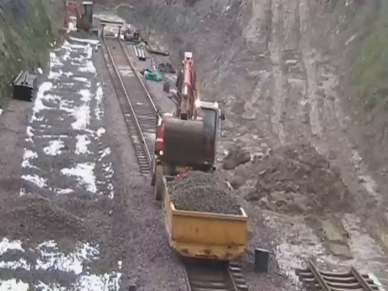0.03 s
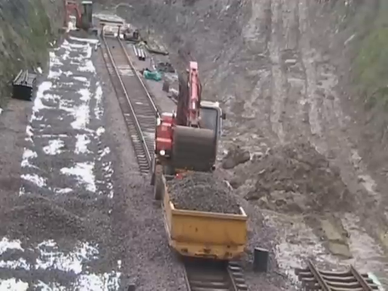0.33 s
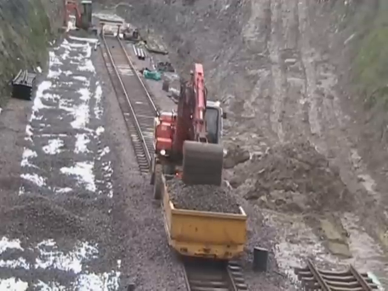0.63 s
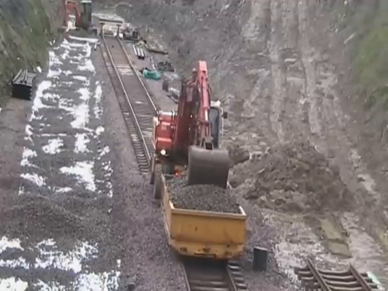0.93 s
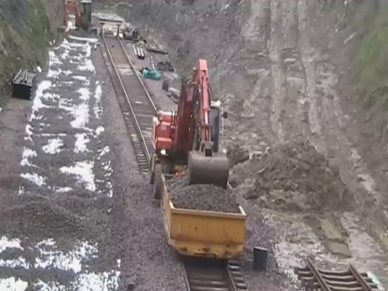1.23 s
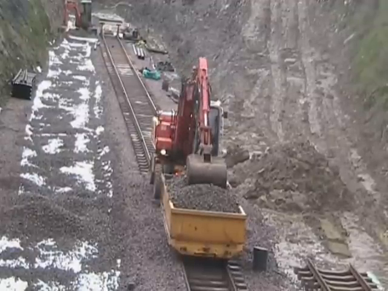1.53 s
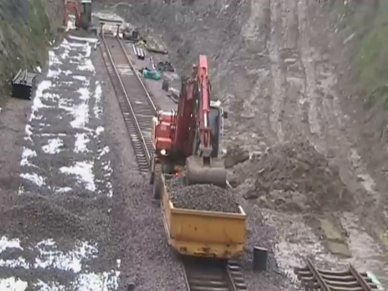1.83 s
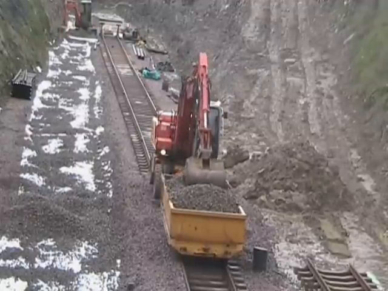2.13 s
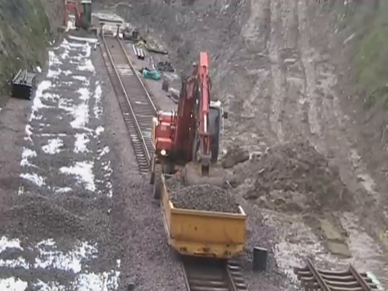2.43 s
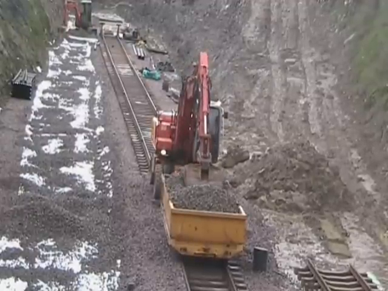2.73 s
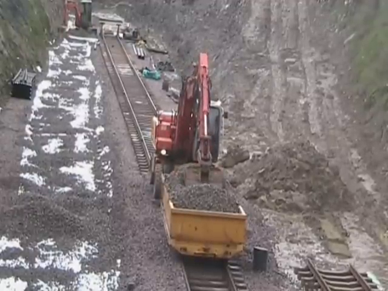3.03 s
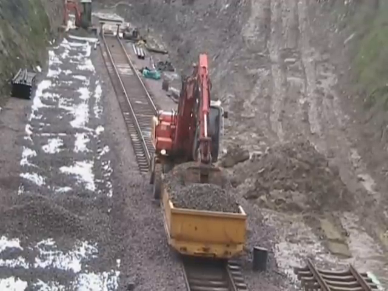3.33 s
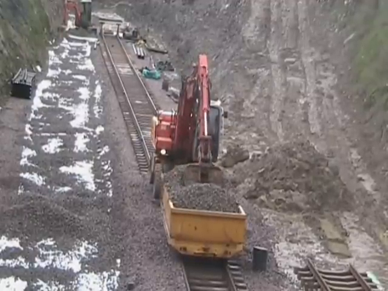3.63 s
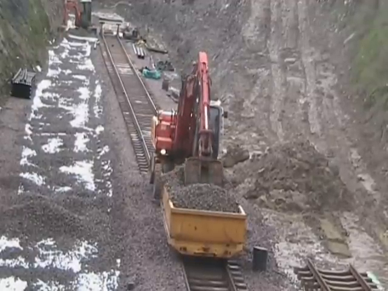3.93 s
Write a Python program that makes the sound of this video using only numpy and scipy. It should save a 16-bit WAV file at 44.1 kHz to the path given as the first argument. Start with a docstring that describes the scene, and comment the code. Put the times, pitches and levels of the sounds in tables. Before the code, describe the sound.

An excavator bucket bangs and scrapes through crunching stones in a wagon, its diesel engine rumbling.

```python
"""In a railway cutting, some way off, a diesel excavator rumbles while its hydraulic pump whines.
Its steel bucket bangs into a wagon of ballast (track stones) and scrapes through it: the wagon booms,
the stones crunch, and loose ones clatter and tick against the steel as the bucket curls.
Small birds call faintly over a very light breeze."""
import sys
import numpy as np
from scipy import signal
from scipy.fft import rfft, irfft
from scipy.io import wavfile
from scipy.ndimage import uniform_filter1d

SR = 44100
rng = np.random.default_rng(int(sys.argv[2]) if len(sys.argv) > 2 else 0)


def materialize(psi):
    """Save the field psi as 16-bit PCM at rate SR to the path in sys.argv[1].

    A 1-D psi becomes a single channel; in a 2-D psi each row is a channel.
    """
    bounded = np.clip(np.atleast_2d(psi).T, -1, 1)
    quanta = np.round(bounded * 32767).astype(np.int16)
    wavfile.write(sys.argv[1], SR, quanta)


N = 176400
T = np.arange(N) / SR
HIT_T = T[:SR // 4]  # the clock for a single hit: a quarter of a second


# the bucket hits the load: (time [s], level [dB], brightness [Hz])
BUCKET_BLOWS = [(.628, -11.5, 400), (.647, -13, 900), (0.663, -12, 647), (.679, -16, 1000),
                (.692, -6, 1660), (.705, -8, 660), (0.804, -11, 590), (.839, -15.5, 500),
                (2.658, -15.5, 500), (2.731, -18, 400), (3.727, -23.5, 448)]
# notes of the bucket and wagon: (pitch [Hz], level [dB], time to fade by 60 dB [s])
STEEL_NOTES = [(165.6, -8.5, 0.17), (192.6, -7, 0.15), (255, -9.5, 0.13), (375, -11.5, 0.23),
               (557, -10, .19), (818, -17.5, 0.47), (1077, -13, 0.18), (1500, -32, .25)]
def bucket():
    """Each blow crushes a few stones and sets the steel ringing."""
    out = np.zeros(N)
    attack_s, crush_decay_s = .0011, .0086
    for s, db, bright_hz in BUCKET_BLOWS:
        noise = band(rng.standard_normal(len(HIT_T)), [168, 2870], "band")
        blow = rms_one(band(noise, bright_hz, "low")) * np.exp(-HIT_T / crush_decay_s)
        for hz, note_db, fade_s in STEEL_NOTES:
            # a dull blow barely rings the high notes
            strength = from_db(note_db + rng.normal(0, 1)) / np.hypot(1, hz / bright_hz)
            blow = blow + strength * ring(hz, fade_s)
        add(out, s, from_db(db) * blow * (1 - np.exp(-HIT_T / attack_s)))
    return band(out, 170, "high")


# how loud each part of the shifting load is: (time [s], level [dB])
BOOM_LEVEL = [(0, -91.5), (.62, -70), (.68, -17.5), (.9, -25.5), (1.1, -23.5), (1.3, -21.5), (1.55, -23.5),
              (1.8, -21.5), (2.1, -26), (2.4, -23.5), (2.68, -18.5), (3.0, -24.5), (3.4, -28),
              (3.65, -36.5), (3.82, -28.5), (4, -38)]
CRUNCH_LEVEL = [(0, -90), (.6, -92), (.66, -24.5), (.87, -26.5), (1.0, -22.5), (1.12, -24.5), (1.32, -20),
                (1.72, -20.5), (1.9, -24), (2.15, -26.5), (2.35, -25), (2.6, -18.5), (2.85, -24),
                (3.15, -28.5), (3.45, -28.5), (3.68, -32), (3.82, -28.5), (4, -34.5)]
CLATTER_LEVEL = [(0, -99), (.61, -75), (.66, -32.5), (.87, -36), (.93, -25), (1.02, -23.5), (1.12, -28),
                 (1.4, -25), (1.75, -26.5), (2.15, -32.5), (2.4, -29.5), (2.62, -26), (2.88, -25.5),
                 (2.97, -30), (3.18, -36), (3.48, -27), (3.7, -30), (4, -27.5)]
CHIP_LEVEL = [(0, -93), (.62, -61), (.68, -41.5), (.87, -48.5), (.92, -36.5), (1.02, -29.5), (1.13, -33.5),
              (1.5, -31.5), (1.85, -37.5), (2.3, -39.5), (2.65, -34), (2.9, -35), (3.05, -41.5),
              (3.32, -37), (3.55, -33), (3.72, -34.5), (4, -34.5)]
# each part's mix of low and high sound: (frequency [Hz], relative level [dB])
BOOM_SPECTRUM = [(45, -35), (75, -15), (110, -11), (170, -3), (230, -5), (285, 1.5), (340, -6), (410, -13),
                 (520, -30.5)]
CRUNCH_SPECTRUM = [(370, -8.5), (450, -1.5), (620, -3), (810, -2), (930, -4), (1160, -3.5), (1290, -3.5),
                   (1520, -6.5), (1900, -14.5)]
CLATTER_SPECTRUM = [(1500, -22.5), (1850, -8.5), (2150, 1.5), (2450, -4), (2800, -5), (3200, -11),
                    (3900, -18.5)]
CHIP_SPECTRUM = [(3200, 0.5), (4000, 1.5), (5200, -1), (6500, -6.5), (7600, -9.5), (8800, -15.5),
                 (10000, -29.5)]
def ballast():
    """The load shifts: the wagon booms, stones crunch and clatter, and fine chips tick on top."""
    return (gravel(BOOM_LEVEL, BOOM_SPECTRUM, hits_per_s=770, spread_db=.5, bands=14)
            + gravel(CRUNCH_LEVEL, CRUNCH_SPECTRUM, hits_per_s=1900, spread_db=3, bands=22)
            + gravel(CLATTER_LEVEL, CLATTER_SPECTRUM, hits_per_s=1500, spread_db=0, bands=10)
            + gravel(CHIP_LEVEL, CHIP_SPECTRUM, hits_per_s=3200, spread_db=0, bands=12))


def gravel(level, spectrum, hits_per_s, spread_db, bands):
    """Stones collide at random; each hit rings its own mix of narrow frequency bands."""
    hits = np.flatnonzero(rng.random(N) < hits_per_s / SR)
    sizes = from_db(spread_db * np.minimum(rng.exponential(1, N), 4))[hits]
    edges = np.geomspace(spectrum[0][0], spectrum[-1][0], bands + 1)
    out = np.zeros(N)
    for low, high in zip(edges, edges[1:]):
        clicks = np.zeros(N)
        clicks[hits] = sizes * rng.standard_normal(N)[hits]
        out += from_db(at_hz(spectrum, np.sqrt(low * high))) * band(clicks, [low, high], "band")
    # even out the loudness over this stretch, so the stones sound steady and follow their level curve
    window = int(.086 * SR)
    power = uniform_filter1d(uniform_filter1d(out ** 2, window), window)
    return from_db(in_time(level)) * out / np.sqrt(np.abs(power) + 1e-12)


# steel dragging through the stones: (time [s], level [dB])
SCRAPE_LEVEL = [(.86, -73.5), (.96, -26.5), (1.25, -23.5), (1.6, -23.5), (1.85, -28.5), (2.2, -33),
                (2.6, -27.5), (2.95, -38), (4, -34)]
# notes of the dragged bucket: (pitch [Hz], width [Hz], relative level [dB])
SCRAPE_NOTES = [(810, 18, -3), (1034, 53, -5.5), (1272, 42, -1), (1427, 35, -6.5), (1947, 20, -8)]
def scrape():
    """Stones slip along the steel and ring its notes, which wander as the load shifts."""
    slips_per_s, wander = 500, .015
    slips = rng.random(N) < slips_per_s / SR
    out = np.zeros(N)
    for hz, width_hz, db in SCRAPE_NOTES:
        kicks = slips * (rng.standard_normal(N) + 1j * rng.standard_normal(N))  # random size and phase
        fading = signal.lfilter([1], [1, -np.exp(-np.pi * width_hz / SR)], kicks + 1e-18)
        pitch = hz * (1 + wander * drift(2.5))
        note = np.real(fading * np.exp(2j * np.pi * np.cumsum(pitch) / SR))
        out += from_db(db) * rms_one(note)
    return from_db(in_time(SCRAPE_LEVEL)) * rms_one(out)


# the bucket's lip catches, and stones knock inside its shell: (time [s], level [dB])
LIP_CHINKS = [(.888, -21), (.899, -22), (.934, -17.5), (.962, -22), (.995, -24.5), (1.008, -19.5),
              (1.016, -15.5)]
SHELL_KNOCKS = [(2.777, -18), (2.806, -18.5), (2.816, -14), (2.905, -14), (3.236, -21), (3.557, -25),
                (3.578, -18), (3.622, -22), (3.728, -16)]
# notes of the lip and shell: (pitch [Hz], level [dB], time to fade by 60 dB [s])
LIP_NOTES = [(2640, -14.5, .07), (2930, -0.5, 0.084), (3150, -5.5, 0.063), (3268, -13.5, .15),
             (3950, -7.5, 0.058)]
SHELL_NOTES = [(2050, -8, 0.083), (2180, -5, 0.056), (2325, -7, 0.047), (2814, -7.5, 0.099)]
def struck_steel(hits, notes):
    """Steel rings briefly and brightly, a little differently at each spot that is hit."""
    out = np.zeros(N)
    for s, db in hits:
        for hz, note_db, fade_s in notes:
            pitch = hz * (1 + rng.normal(0, .008))
            add(out, s, from_db(db + note_db) * ring(pitch, fade_s))
    return out


# single stones collide: (time [s], level [dB], pitch [Hz], width [octaves], decay time [s])
STONE_CRACKS = [(.684, -31.5, 5200, 1.3, .018), (.887, -29.5, 4500, 0.23, .01),
                (.961, -24.5, 3300, 1.2, 0.006), (1.001, -21, 5200, 0.44, 0.0065),
                (1.01, -25, 5160, 1, 0.01), (1.118, -29, 5450, 0.73, .009), (1.935, -28, 5750, 0.64, 0.012),
                (2.107, -27, 5300, 0.55, .008), (2.207, -21, 2960, 0.61, 0.0087),
                (2.207, -21, 7000, 0.61, 0.0092), (2.558, -25.5, 6000, 0.97, 0.02),
                (2.654, -23.5, 5400, 0.51, 0.0063), (3.069, -28, 4500, 1.4, .009),
                (3.166, -26.5, 5070, 1.2, .006), (3.232, -28, 3400, 1.4, .008),
                (3.498, -23, 3912, 0.81, 0.013), (3.556, -22, 4900, 0.71, .009),
                (3.585, -25, 4500, 1.3, 0.0031), (3.642, -18, 6530, 0.21, .004),
                (3.768, -27, 5600, 0.7, .004), (3.861, -24.5, 6200, 1.6, .009),
                (3.956, -14.5, 5016, 3.1, 0.0033)]
def loose_stones():
    """Each stone cracks around its own pitch: a snap at first touch, then a short rattle."""
    out = np.zeros(N)
    snap_gain, snap_s = .16, .0016
    for s, db, hz, octaves, decay_s in STONE_CRACKS:
        contacts = burst(decay_s) + snap_gain * burst(snap_s)
        edge_ratio = 2 ** (octaves / 2)
        crack = band(contacts, [hz / edge_ratio, hz * edge_ratio], "band", order=1)
        add(out, s, from_db(db) * np.sqrt(SR * decay_s / 2) * crack / np.linalg.norm(crack))
    return band(out, 6700, "low")


# how fast the engine's shaft spins: (time [s], speed [turns per s])
SHAFT_SPEED = [(0, 26.8), (.55, 26.9), (1.4, 30.4), (2.3, 27.4), (3.1, 28.7), (3.8, 28.3), (4, 27.4)]
# engine tones: (pitch [multiple of shaft speed], level [dB])
ENGINE_TONES = [(3, -49.5), (12, -50), (15, -53), (19, -43), (27, -48.5)]
# pump and gear whines: (pitch at starting speed [Hz], level [dB])
PUMP_WHINES = [(220, -38), (280, -29.5), (1217, -47)]
# the engine's rumble: (frequency [Hz], relative level [dB])
RUMBLE_SPECTRUM = [(45, -48.5), (85, -30.5), (135, -17), (195, -9.5), (250, -11), (310, -12), (390, -19.5),
                   (720, -23.5), (1250, -26.5), (1700, -34), (2200, -33), (3300, -42.5), (5500, -45.5),
                   (10000, -53)]
def engine():
    """A four-cylinder diesel: wavering tones follow the shaft, and the rumble throbs with each firing."""
    speed_wobble, flutter_db, waver_radians = .00383, .5, .15
    rumble_db, throb_depth = -28.5, .056
    speed = in_time(SHAFT_SPEED) * (1 + speed_wobble * drift(4.05))
    angle = 2 * np.pi * np.cumsum(speed) / SR
    whines = [(hz / SHAFT_SPEED[0][1], db) for hz, db in PUMP_WHINES]
    tones = np.zeros(N)
    for multiple, db in ENGINE_TONES + whines:
        gain = from_db(db + flutter_db * drift(8.6))
        tones += gain * np.sin(multiple * angle + 2 * np.pi * rng.random() + waver_radians * drift(23))
    throb = 1 + throb_depth * np.cos(2 * angle)  # two firings per turn
    rumble = colour(rng.standard_normal(N) * throb, RUMBLE_SPECTRUM)
    return np.sqrt(2) * tones + from_db(rumble_db) * rms_one(band(rumble, 62, "high"))


# runs of quick notes: (time [s], length [s], level [dB])
BIRD_PIPING = [(0, .16, -54), (.26, .19, -53), (0.635, .04, -48)]
# thin whistles: (time [s], length [s], pitch [Hz], final drop [Hz], level [dB])
BIRD_WHISTLES = [(0.432, .112, 5660, 360, -40.5), (2.822, .12, 5690, 130, -41)]
def birds():
    """Small birds on the slopes pipe on one pitch, or whistle a note that holds and then falls."""
    out = np.zeros(N)
    pipe_hz, notes_per_s = 4310, 21
    for s, length, db in BIRD_PIPING:
        t = T[:int(length * SR)]
        pulses = np.abs(np.sin(np.pi * notes_per_s * t))
        add(out, s, whistle(np.full(len(t), pipe_hz), db) * pulses)
    for s, length, hz, drop_hz, db in BIRD_WHISTLES:
        progress = np.linspace(0, 1, int(length * SR))
        add(out, s, whistle(hz - drop_hz * progress ** 3, db))
    return out + echo(out, db=-13, fade_s=.35)


def whistle(pitch, db):
    """One nearly pure bird note that trembles a little in pitch and loudness."""
    n = len(pitch)
    roughness, flutter_db = .004, 2.5
    phase = 2 * np.pi * np.cumsum(pitch * (1 + roughness * drift(200)[:n])) / SR
    gain = from_db(db + flutter_db * drift(90)[:n]) * signal.windows.tukey(n, .2)
    return np.sqrt(2) * gain * np.sin(phase)


def echo(x, db, fade_s):
    """Sound bounces off the wagon and the slopes as a dense, dull tail."""
    tail = band(burst(fade_s / np.log(1000)), 7700, "low", order=1)
    return from_db(db) * signal.fftconvolve(x, tail / np.linalg.norm(tail))[:N]


def breeze():
    """Air buffets the left and right microphone openings separately, faint and low."""
    left_db, right_db = -72, -51.5
    return np.array([from_db(db) * rms_one(band(rng.standard_normal(N), [45.2, 75], "band"))
                     for db in (left_db, right_db)])


# how wide the sound spreads: (frequency [Hz], side level compared with the middle [dB])
STEREO_WIDTH = [(50, -2.5), (130, -4.5), (300, -33), (1000, -17.5), (2200, -17), (4500, -10), (8000, -15.5)]
# which side is louder: (frequency [Hz], left minus right [dB])
LEFT_BALANCE = [(60, -18.5), (170, -0.5), (460, -2), (1290, -1.0), (3600, -0.5), (10000, -1)]
# how far the left wave runs ahead: (frequency [Hz], phase lead [radians])
LEFT_LEAD = [(50, .1), (260, 0.49), (1640, 0.29), (4480, 0.53), (6500, 0.23), (9000, 2.2)]
def stereo(mid):
    """Two close microphone openings hear slightly different waves; scattered sound adds width."""
    scattered = np.real(signal.hilbert(mid) * np.exp(1j * np.pi * drift(17.6)))  # wandering phase
    side = colour(scattered, STEREO_WIDTH)
    hz = np.arange(N // 2 + 1) * SR / N
    half_shift = from_db(at_hz(LEFT_BALANCE, hz) / 2) * np.exp(.5j * at_hz(LEFT_LEAD, hz))
    direct = irfft(rfft(mid) * np.array([half_shift, 1 / half_shift]), N)
    return direct + np.array([side, -side])


def ring(hz, fade_s):
    """One note of struck steel, dying away by 60 dB in fade_s."""
    return np.sin(2 * np.pi * (hz * HIT_T + rng.random())) * np.exp(-np.log(1000) * HIT_T / fade_s)


def burst(decay_s):
    """Noise that dies away, like a run of tiny contacts."""
    return rng.standard_normal(len(HIT_T)) * np.exp(-HIT_T / decay_s)


def drift(rate_hz):
    """A smooth random wander, about 1 in size."""
    step, warm_up = 40, 2000
    pole = np.exp(-2 * np.pi * rate_hz * step / SR)
    noise = rng.standard_normal(N // step + warm_up + 2)
    slow = signal.lfilter([1], [1, -2 * pole, pole * pole], noise)[warm_up:]
    return np.interp(np.arange(N) / step, np.arange(len(slow)), rms_one(slow))


def from_db(db):
    """Turn decibels into a multiplier."""
    return 10 ** (np.asarray(db) / 20)


def rms_one(x):
    """Scale a sound to an average power of 1."""
    return x / np.sqrt(np.mean(x ** 2) + 1e-20)


def in_time(rows):
    """Join (time [s], value) points with straight lines."""
    return np.interp(T, *np.transpose(rows))


def at_hz(points, hz):
    """Read between (frequency [Hz], value) points, with octaves evenly spaced."""
    frequencies, values = np.transpose(points)
    return np.interp(np.log(hz + 1e-3), np.log(frequencies), values)


def band(x, hz, kind, order=2):
    """Keep the lows, the highs or a band in between."""
    return signal.sosfilt(signal.butter(order, hz, kind, fs=SR, output="sos"), x + 1e-18)


def colour(x, spectrum):
    """Turn each frequency up or down as the table says."""
    hz = np.arange(N // 2 + 1) * SR / N
    return irfft(rfft(x) * from_db(at_hz(spectrum, hz)), N)


def add(out, s, x):
    """Mix x in from time s."""
    start = int(s * SR)
    out[start:start + len(x)] += x[:max(N - start, 0)]


def scene():
    """The digging and its echo, the engine and the birds sound from ahead, over the breeze."""
    digging = ballast() + scrape() + bucket()
    digging += struck_steel(LIP_CHINKS, LIP_NOTES) + struck_steel(SHELL_KNOCKS, SHELL_NOTES)
    digging += loose_stones()
    mid = engine() + birds() + digging + echo(digging, db=-15, fade_s=.27)
    return stereo(mid) + breeze()


def record(dry):
    """Round off the loudest peaks and cut the highest treble."""
    stop_hz = 11400
    rounded = dry / (1 + dry ** 6) ** (1 / 6)
    return signal.sosfilt(signal.cheby2(14, 90, stop_hz, fs=SR, output="sos"), rounded)


dry = scene()
out = record(dry)
materialize(out)
```